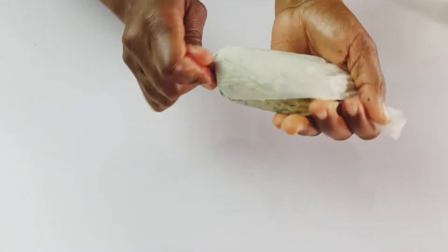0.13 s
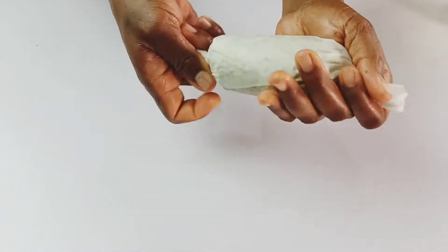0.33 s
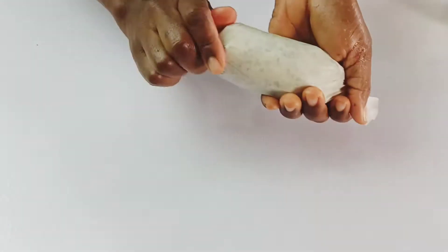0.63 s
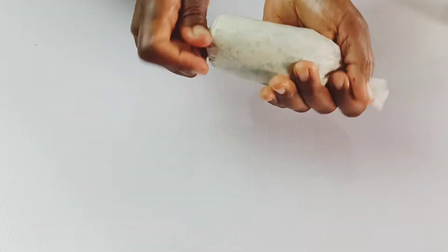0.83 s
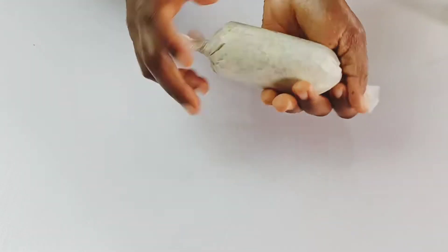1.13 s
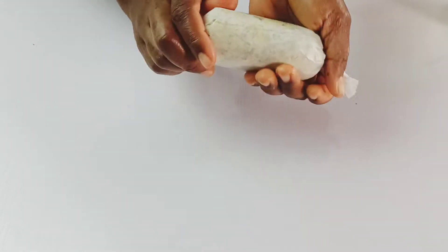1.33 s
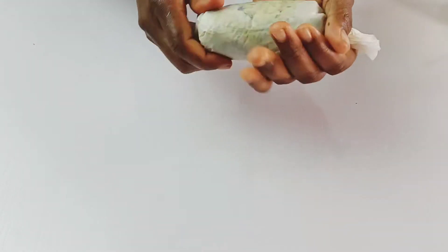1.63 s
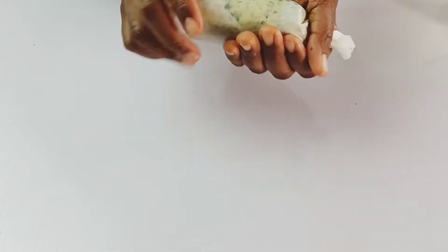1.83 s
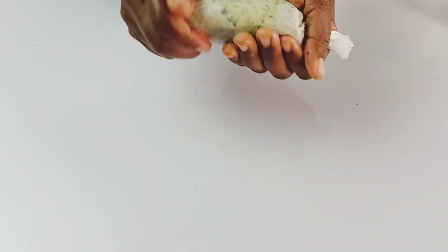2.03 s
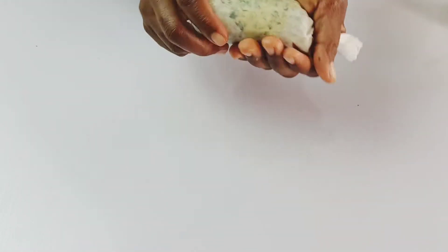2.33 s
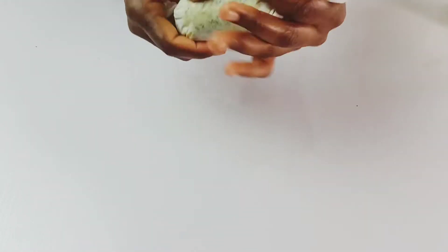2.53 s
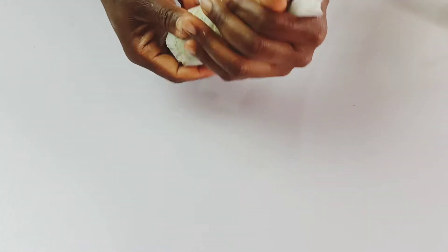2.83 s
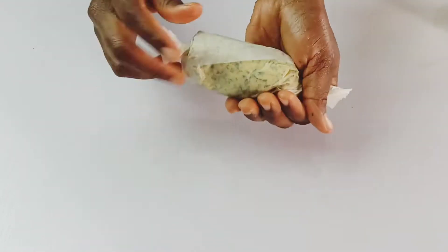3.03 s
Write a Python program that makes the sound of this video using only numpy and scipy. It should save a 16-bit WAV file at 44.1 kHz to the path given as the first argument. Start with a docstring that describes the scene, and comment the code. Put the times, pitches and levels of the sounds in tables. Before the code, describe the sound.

Parchment paper crinkling and snapping close up as hands twist it around butter.

```python
"""A kitchen worktop, where two hands twist parchment paper round a roll of soft butter.
Creases buckle in short bright snaps, and a rain of tiny crinkles follows the twisting; fingers
knock the roll and a palm slides along it once. The worktop and the room reflect these sounds,
and an appliance hums far off. The sound is close, in stereo, with a deep dip round 10 kHz."""
import sys
import numpy as np
from scipy import signal
from scipy.fft import rfft, irfft
from scipy.io import wavfile

SR = 44100
rng = np.random.default_rng(int(sys.argv[2]) if len(sys.argv) > 2 else 0)


def master(y):
    """Save y as 16-bit WAV."""
    cut = np.clip(np.atleast_2d(y).T, -1, 1)
    pcm = np.round(cut * 32767)  # scale
    wavfile.write(sys.argv[1], SR, pcm.astype(np.int16))


N = 141120

# Creases that snap: start_s, strength_db, facet_pitch_hz, brightness_db, airiness_db
CREASE_SNAPS = [(.031, -23.5, 3800, -7, -29), (0.0355, -29, 3450, -2, -26), (0.0835, -35, 4340, -22, -56),
                (0.1267, -32, 4450, -8, -25), (0.159, -42, 4140, 6.5, -6.5), (0.1891, -36.5, 4040, 3, -20),
                (0.267, -39.5, 5300, -21, -13.5), (0.274, -47.5, 4560, 10.5, -12),
                (0.324, -42.5, 3330, 1, -31), (0.3451, -36, 3440, -36, -37), (0.382, -47.5, 3940, -13, -30),
                (0.4385, -31, 3430, -18, -21), (0.4422, -40, 3400, 8.5, -20),
                (0.5924, -33.5, 3090, -4.5, -26), (0.6142, -60.5, 3200, 24.5, -5),
                (0.637, -40, 4130, 1, -18), (0.6549, -38, 3850, 5, -13), (0.6846, -38.5, 3520, 2, -33),
                (0.6901, -31, 3330, -10, -34), (0.7353, -51, 3300, 14.5, -14), (0.806, -45, 4470, 8, -9),
                (0.81, -38.5, 4500, -6, -8.5), (0.9059, -42.5, 4250, 10, -6.5),
                (0.9576, -26.5, 4420, -1, -20.5), (1.0796, -49.5, 3320, 11, -9),
                (1.0948, -41, 5230, 5.5, -7.5), (1.1075, -34.5, 4240, 3, -18.5),
                (1.264, -37.5, 4000, 1, -20), (1.3024, -45.5, 4800, -26, -10.5),
                (1.321, -28, 4080, -8.5, -28), (1.336, -46, 4400, 4, -8), (1.3626, -42, 4440, 4, -11.5),
                (1.37, -37.5, 3800, -10, -25), (1.4256, -30, 4160, -9, -28), (1.4392, -43, 4300, 2, -21),
                (1.4736, -32, 4600, 0.5, -14), (1.5021, -33, 4080, -2, -15.5), (1.5506, -43, 4700, 3, -8.5),
                (1.5671, -38.5, 3870, -10, -30), (1.6242, -40, 4870, -3, -6.5),
                (1.7119, -32.5, 2680, -6, -43), (1.756, -29.5, 2820, -12, -27), (1.7794, -35, 4450, 0, -21),
                (1.9239, -45, 2900, 13, -3), (1.9325, -39, 2790, 5.5, -10), (2.0817, -44, 3100, -2.5, -28),
                (2.0988, -35, 3160, -15, -24), (2.1221, -36, 3560, -3, -42), (2.2734, -45.5, 3530, 2, -19),
                (2.3228, -53.5, 3830, 7.5, 6.5), (2.354, -37, 4300, -2.5, -35), (2.44, -33, 4550, -10, -17),
                (2.4624, -30, 3830, -32, -37), (2.5234, -29, 3570, -6, -25), (2.5373, -36.5, 4000, -7, -31),
                (2.5925, -34.5, 2800, -2, -19.5), (2.8667, -41, 2430, 1.5, -21),
                (3.009, -42.5, 3700, 0.5, -20), (3.0186, -42.5, 4550, 11, -6), (3.1431, -43, 2790, -1, -13),
                (3.1936, -32.5, 5500, -4.5, -23)]
# Course of the crinkling as the hands twist: time_s, level_db, treble_weight_db, crunch_weight_db
TWIST_ENVELOPE = [(0.0, -38, -9, -14), (0.03, -40.5, -7, -16.5), (0.429, -55, -3.5, -6.5),
                  (0.44, -48.5, -25, -4.5), (0.56, -57, -10, -14.5), (0.6, -40, -5, -20),
                  (0.88, -47.5, -8.5, -17), (0.91, -43.5, 2, -18), (1.05, -45.5, -18, -20.5),
                  (1.1, -41, -21, -9), (1.18, -56, -11, -18), (1.47, -41, -9, -16), (1.688, -56, -7, -6.5),
                  (1.748, -34, -0.5, -13), (1.899, -52, -12.5, -15), (1.921, -42.5, -6, -10.5),
                  (2.06, -60, 1.5, -11.5), (2.099, -41.5, -3, -7), (2.18, -59.5, -12, -11),
                  (2.235, -54, -4, -13), (2.262, -42, -4, -8), (2.3, -55, -8, -12),
                  (2.47, -44, -1.5, -14.5), (2.82, -57.5, -27, -15), (2.89, -55, -6, -9),
                  (2.923, -40, -5.5, -15), (2.98, -71.5, -23, -16.5), (3.01, -48.5, -4.5, -12.5),
                  (3.17, -53.5, -6, -19), (3.2, -30.5, -12, -34)]
# Filter that colours the crinkle: frequency_hz, gain_db
CRINKLE_SPECTRUM = [(290, -66), (500, -15), (1250, -10), (3290, -2), (4540, -1), (5250, -10), (7350, 0),
                    (8380, -11.5), (10600, -31), (12100, -15.5), (14800, -21), (15700, 2), (16400, -41)]
# Fingers knocking the roll: start_s, peak_db, pitch_hz
FINGER_KNOCKS = [(0.442, -38, 730), (0.592, -40.5, 690), (0.811, -43, 870), (1.096, -37.5, 1930),
                 (1.575, -35.5, 1000), (1.662, -44, 1020), (2.5225, -28, 1620), (3.193, -38, 501)]
# Spectrum of the room's rumble and hiss: frequency_hz, relative_density_db
ROOM_SPECTRUM = [(15, -48), (25, 5.5), (209, -2.5), (631, -12), (1200, -20.5), (1450, -18), (2300, -19.5),
                 (4150, -39), (7000, -20), (10400, -37.5), (15500, -16.5)]

SNAP_CORRELATION, DULL_CORRELATION = 0.12, 0.43   # left with right; dull: hands and room noise


def crease_snaps():
    """Buckling: a sharp snap rings a facet, with a faint, brief rise and fade of noise around it."""
    span = 1536   # samples, centred on the release
    snap_decay_s, fade_s = 0.00033, 0.0043
    out = np.zeros((2, N + span))
    t = np.arange(-span // 2, span // 2) / SR
    release = np.maximum(t, 0) ** 2 * np.exp(-np.abs(t) / snap_decay_s)
    rise_and_fade = amp(-16.5) * np.exp(-np.abs(t) / fade_s)
    envelope = release / release.max() + rise_and_fade
    for start_s, strength_db, pitch_hz, brightness_db, airiness_db in CREASE_SNAPS:
        burst = stereo_noise(span, SNAP_CORRELATION) * envelope
        width_hz = 0.52 * pitch_hz
        facet = resonate(resonate(burst, pitch_hz, width_hz), pitch_hz, width_hz)
        thump = band(burst, (500, 1810))
        crack = band(burst, (5870, 7730))
        air = band(burst, (11160, 16560))
        parts = [(facet, 8), (thump, -14), (crack, brightness_db + 11), (air, airiness_db + 22.5)]
        start = int(start_s * SR)
        for part, relative_db in parts:
            peak = np.abs(part).max(axis=1, keepdims=True)
            out[:, start:start + span] += amp(strength_db + relative_db) * part / peak
    return out[:, span // 2:N + span // 2]


def crinkle():
    """Shot noise: tiny creases click in clumps, each ringing a facet at its own pitch and side."""
    base_rate_per_s, clump_db, size_spread_db, facet_q = 4000, 4.5, 3.5, 4.7
    time_s, *curves = np.transpose(TWIST_ENVELOPE)
    level_db, treble_db, crunch_db = (np.interp(np.arange(N) / SR, time_s, c) for c in curves)
    treble, crunch = amp(treble_db + 12.5), amp(crunch_db + 14)
    clumping = unit_rms(band(rng.standard_normal(N), (8, 60)))
    fires = rng.random(N) < base_rate_per_s * amp(clump_db * clumping) / SR
    size_db = size_spread_db * np.minimum(rng.exponential(1, N), 3.5)
    clicks = fires * amp(size_db) * rng.standard_normal((2, N))
    facet_of_click = rng.integers(0, 16, N)
    rings = np.zeros((2, N))
    for facet, pitch_hz in enumerate(np.geomspace(600, 16000, 16)):
        weight = treble if pitch_hz > 10000 else crunch if pitch_hz < 3700 else 1
        drive = clicks * (facet_of_click == facet) * weight + 1e-18
        rings += resonate(drive, pitch_hz, pitch_hz / facet_q)
    return amp(level_db - 2.5) * unit_rms(colour(rings, CRINKLE_SPECTRUM))


def finger_knocks():
    """Damped impact: each knock on the soft roll is a short, dull burst of noise."""
    span, decay_s, edge_ratio = 512, 0.0007, 1.415
    out = np.zeros((2, N + span))
    t = np.arange(span) / SR
    for start_s, peak_db, pitch_hz in FINGER_KNOCKS:
        burst = stereo_noise(span, DULL_CORRELATION) * t * np.exp(-t / decay_s)
        knock = band(burst, (pitch_hz / edge_ratio, pitch_hz * edge_ratio))
        start = int(start_s * SR)
        out[:, start:start + span] += amp(peak_db) * knock / np.abs(knock).max()
    return out[:, :N]


def palm_slide():
    """Friction: a palm sliding along the roll gives one swell of low, narrow-band noise."""
    centre_s, sigma_s = 2.452, 0.073
    rub = unit_rms(resonate(stereo_noise(N, DULL_CORRELATION), pitch_hz=320, width_hz=35))
    swell = np.exp(-0.5 * ((np.arange(N) / SR - centre_s) / sigma_s) ** 2)
    return amp(-59) * rub * swell


def worktop_reflection(x, delay_s=0.0042, gain_db=-12.5):
    """Early reflection: the worktop returns one weaker, delayed copy, left and right exchanged."""
    delayed = np.pad(x, ((0, 0), (int(delay_s * SR), 0)))[:, :N]
    return amp(gain_db) * delayed[::-1]


def kitchen_reverberation(x, t60_s=0.3, treble_t60_s=0.31, build_up_s=0.006):
    """Diffuse field: dense reflections build up, then die away exponentially."""
    t = np.arange(SR // 2) / SR
    noise = rng.standard_normal((2, len(t)))
    treble = band(noise, (9000, 17000))
    tail = (noise - treble) * amp(-60 * t / t60_s) + treble * amp(-60 * t / treble_t60_s)
    tail *= 1 - np.exp(-(t / build_up_s) ** 2)
    tail /= np.sqrt(np.sum(tail ** 2) / 2)   # unit energy per channel, on average
    return amp(-2.5) * signal.fftconvolve(x, tail, axes=1)[:, :N]


def room_tone(hum_hz=185.7, width_hz=24):
    """Stationary noise: broad rumble and hiss, and a far appliance's narrow, wavering hum."""
    rumble_and_hiss = unit_rms(colour(stereo_noise(N, DULL_CORRELATION), ROOM_SPECTRUM))
    hum = resonate(rng.standard_normal(N), hum_hz, width_hz)
    hum = unit_rms(resonate(hum, hum_hz, width_hz))
    balance = amp([[1.5], [-1.5]])   # louder on the left
    return balance * (amp(-55) * rumble_and_hiss + amp(-69) * hum)


def amp(db):
    """Decibel law: a tenfold amplitude for every 20 dB."""
    return 10 ** (np.asarray(db) / 20)


def unit_rms(x):
    """Normalisation to a mean power of 1."""
    return x / np.sqrt(np.mean(x ** 2) + 1e-20)


def band(x, edges_hz):
    """Band-pass filtering between two edges."""
    return signal.sosfilt(signal.butter(2, edges_hz, "band", fs=SR, output="sos"), x)


def resonate(x, pitch_hz, width_hz):
    """Damped resonance: a single mode with a peak gain of 1."""
    r = np.exp(-np.pi * width_hz / SR)
    feedback = [1, -2 * r * np.cos(2 * np.pi * pitch_hz / SR), r * r]
    return signal.lfilter([(1 - r * r) / 2, 0, (r * r - 1) / 2], feedback, x)


def colour(x, spectrum):
    """Spectral shaping by a gain curve interpolated over log frequency."""
    frequency_hz, gain_db = np.transpose(spectrum)
    bins_hz = np.maximum(np.arange(N // 2 + 1) * SR / N, 1)
    gain = amp(np.interp(np.log(bins_hz), np.log(frequency_hz), gain_db))
    return irfft(rfft(x) * gain, N)


def stereo_noise(samples, correlation):
    """Partial coherence: left and right share one noise and take another in opposite phase."""
    mid, side = rng.standard_normal((2, samples))
    return np.sqrt(1 + correlation) * mid + np.sqrt(1 - correlation) * side * [[1], [-1]]


def scene():
    """Superposition of the direct sound, its reflections and the background."""
    snaps = crease_snaps()
    rustle = crinkle() + finger_knocks() + palm_slide()
    direct = snaps + rustle
    to_walls = amp(-3.5) * snaps + rustle   # snaps reach the walls weaker than the crinkle
    return direct + worktop_reflection(direct) + kitchen_reverberation(to_walls) + room_tone()


def record(dry):
    """Filter cascade: the sound has a deep dip round 10 kHz and loses the bass and the very top."""
    treble_notch = signal.cheby2(6, 24, (8958, 11347), "bandstop", fs=SR, output="sos")
    bass_cut = signal.butter(2, 106, "high", fs=SR, output="sos")
    top_cut = signal.cheby2(10, 70, 16700, fs=SR, output="sos")
    return signal.sosfilt(np.vstack([treble_notch, bass_cut, top_cut]), dry)


dry = scene()
out = record(dry)
master(out)
```